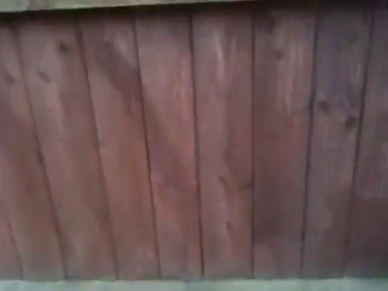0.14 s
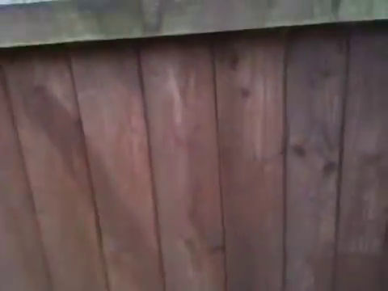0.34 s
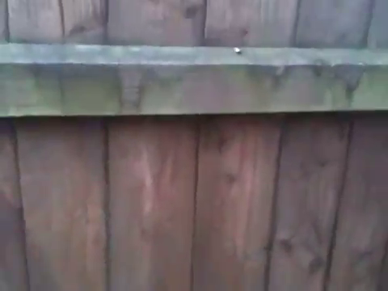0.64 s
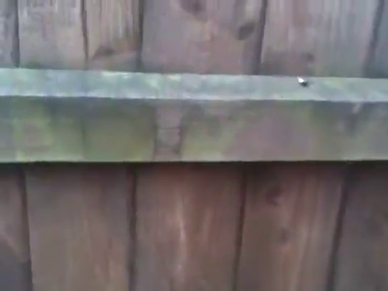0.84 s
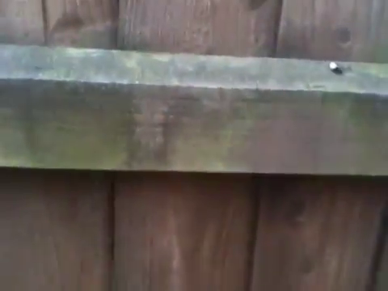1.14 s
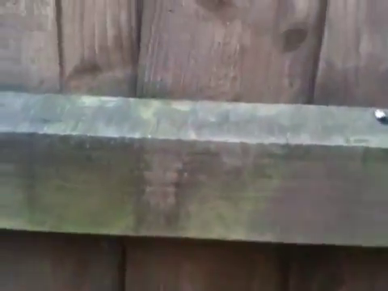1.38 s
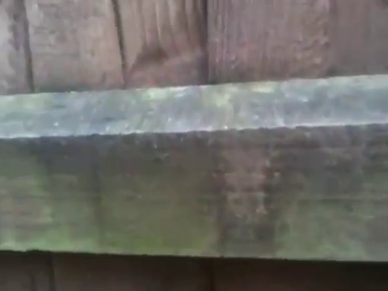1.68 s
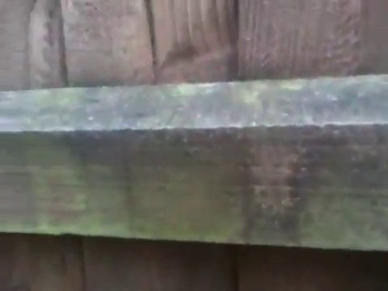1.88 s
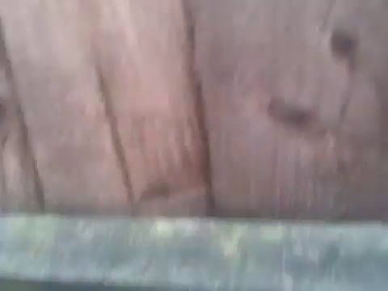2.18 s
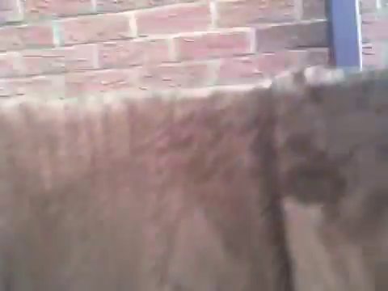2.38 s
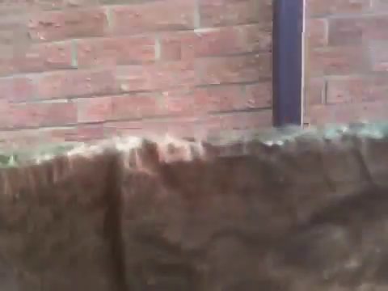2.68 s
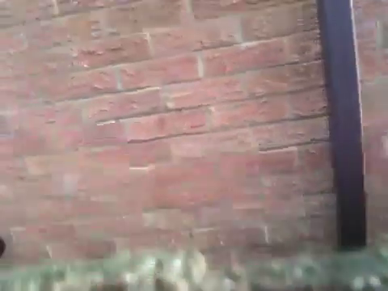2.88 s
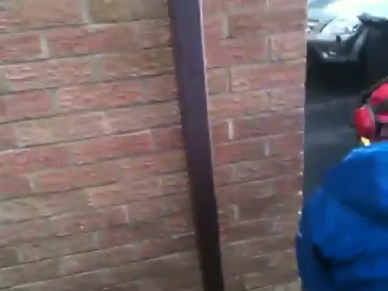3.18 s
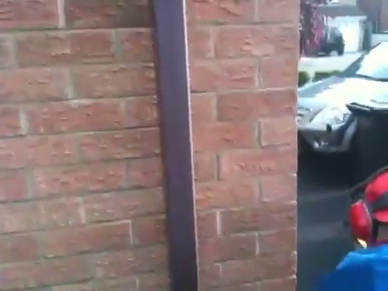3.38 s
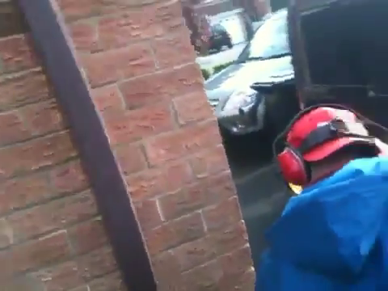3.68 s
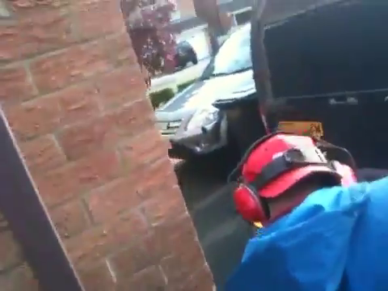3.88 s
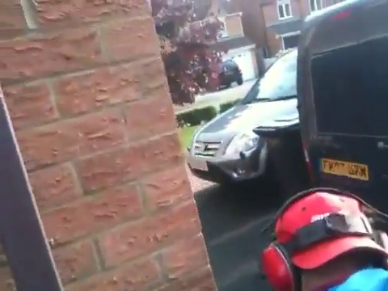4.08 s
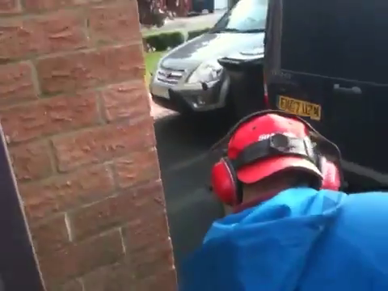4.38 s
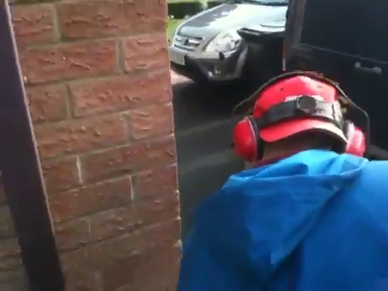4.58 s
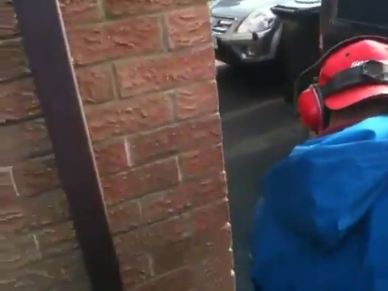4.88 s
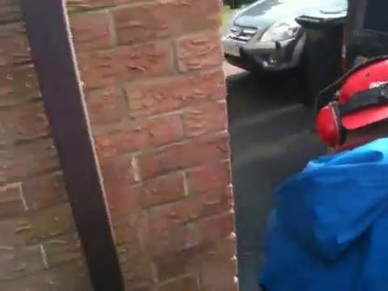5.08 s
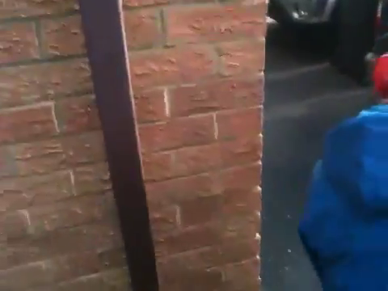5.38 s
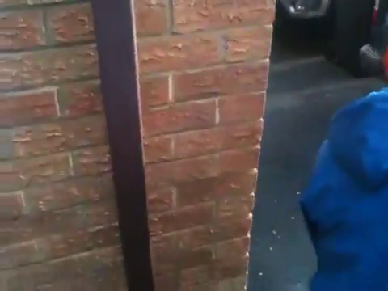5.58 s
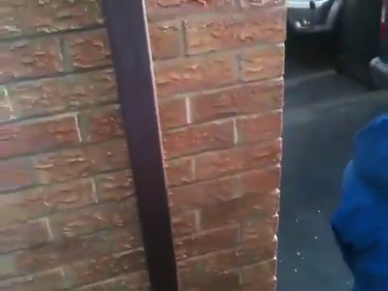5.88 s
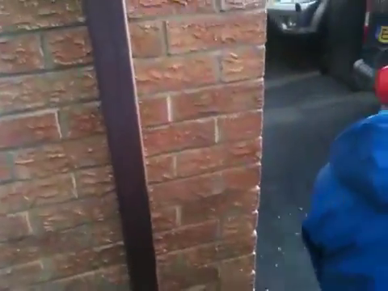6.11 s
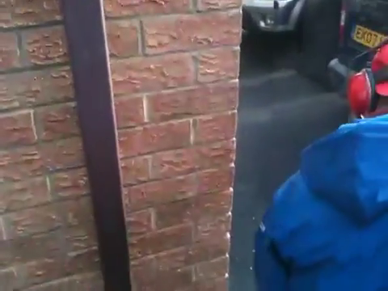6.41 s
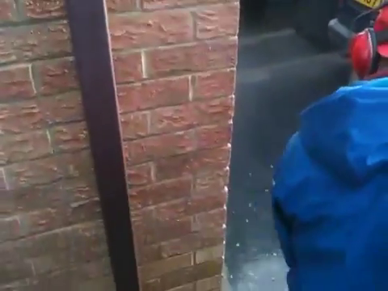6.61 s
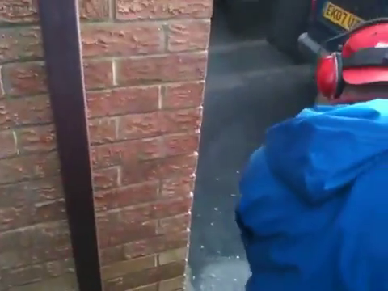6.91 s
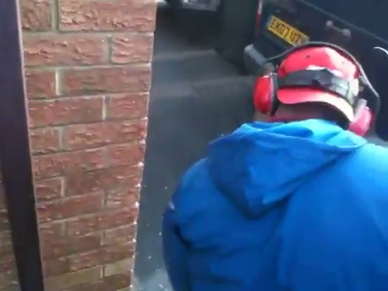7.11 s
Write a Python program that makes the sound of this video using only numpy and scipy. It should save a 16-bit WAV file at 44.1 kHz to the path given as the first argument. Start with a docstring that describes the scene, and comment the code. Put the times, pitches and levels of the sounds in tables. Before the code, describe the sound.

A pressure washer's engine runs steadily, sagging slightly as a hissing water spray begins and swells much louder.

```python
"""A driveway, with a small four-stroke engine humming and clattering behind a wooden fence as it drives
a pressure washer's pump. A trigger opens: the engine sags under the load and a spinning nozzle hisses,
its spray roaring where it lands and rasping when it hits something hollow. The single microphone starts
out screened, then comes closer, round the fence and a brick wall, so the jet grows loud and bright."""
import sys
import numpy as np
from scipy import signal
from scipy.fft import rfft, irfft, next_fast_len
from scipy.io import wavfile
from scipy.ndimage import uniform_filter1d, map_coordinates

SR = 44100
rng = np.random.default_rng(int(sys.argv[2]) if len(sys.argv) > 2 else 0)


def to_wav(s):
    """Save 16-bit WAV."""
    ch = np.atleast_2d(s).T  # columns
    pcm = np.round(np.clip(ch, -1, 1) * 32767)  # PCM
    wavfile.write(sys.argv[1], SR, pcm.astype(np.int16))


N = 319725
TIME = np.arange(N) / SR
TRIGGER_S = 1.752
FENCE_S, FENCE_PASS_S = 3, 1.23  # the microphone starts to clear the fence, and how long it takes
CORNER_S, CORNER_PASS_S = 3.764, 0.36  # the same for the corner of the brick wall


def amp(db):
    """Decibels to gain."""
    return 10 ** (np.asarray(db) / 20)


def unit(x):
    """Scale to rms 1."""
    return x / np.sqrt(np.mean(x ** 2) + 1e-20)


def curves(rows):
    """One value per sample for each column after the time."""
    s, *cols = np.transpose(rows)
    return [np.interp(TIME, s, c) for c in cols]


def ramp(start, length):
    """Rises from 0 to 1."""
    return np.clip((TIME - start) / length, 0, 1)


def wobble(rate):
    """A smooth random curve, rate knots a second."""
    coarse = np.linspace(0, N / SR, num=4000)
    knots = rng.standard_normal(int(N * rate / SR) + 4)
    return np.interp(TIME, coarse, map_coordinates(knots, [coarse * rate]))


def filtered(x, response):
    """x times a response of frequency."""
    m = next_fast_len(N + 8192)
    return irfft(rfft(x, m) * response(np.fft.rfftfreq(m, 1 / SR)), m)[:N]


def coloured(x, points, peaks=()):
    """x with a (Hz, dB) spectrum and (Hz, width, dB) resonances on top, at rms 1."""
    f, db = np.transpose(points)
    bumps = lambda hz: sum(lift / (1 + (2 * (hz - centre) / width) ** 2) for centre, width, lift in peaks)
    return unit(filtered(x, lambda hz: amp(np.interp(np.log(hz + 1), np.log(f), db) + bumps(hz))))


def noise():
    """Fresh white noise."""
    return rng.standard_normal(N)


def throb(turns, depth_db):
    """A gain that peaks once a turn."""
    return unit(amp(depth_db * np.cos(2 * np.pi * turns)))


def patches(shape, bins, frames):
    """A random field of rms 1, smooth over so many bins and frames."""
    field = uniform_filter1d(rng.standard_normal(shape), bins, axis=0)
    return unit(uniform_filter1d(field, frames, axis=1))


def narrow_noise(centre_hz, half_width_hz):
    """Noise around one frequency, at rms 1."""
    return unit(filtered(noise(), lambda hz: 1 / (1 + ((hz - centre_hz) / half_width_hz) ** 2)))


# Exhaust orders picking up speed, running free and under load: multiple of firing rate, relative level/dB
ORDERS_REVVING = [(1, -41), (2, -24), (3, -25), (4, -6), (5, -5.5), (6, -13), (7, -6.5), (8, -0.5),
                  (9, -13), (10, -23), (11, -27), (12, -19), (13, -12.5)]
ORDERS_FREE = [(1, -29), (2, -21), (3, -22), (4, 0), (5, 0), (6, -5), (7, -1.5), (8, -1.5), (9, -10),
               (10, -12), (11, -5.5), (12, -8), (13, -13.5)]
ORDERS_LOADED = [(1, -50), (2, -41), (3, -16), (4, -1), (5, 2.5), (6, -13), (7, 0.5), (8, 3.5), (9, -15),
                 (10, -2), (11, -13), (12, -16), (13, -18)]

def exhaust(cycle, gap_cycles=0.38, dispersion=0.04026):
    """Orders of the firing rate hum; their balance shifts as the engine settles, then takes the load."""
    settled, load = ramp(0.6, 0.12), ramp(TRIGGER_S + 0.27, 0.61)
    hum = np.zeros(N)
    for (order, rev_db), (_, free_db), (_, loaded_db) in zip(ORDERS_REVVING, ORDERS_FREE, ORDERS_LOADED):
        db = rev_db + settled * (free_db - rev_db) + load * (loaded_db - free_db)
        pair = 1 + 0.85 * np.exp(-2j * np.pi * order * gap_cycles)  # two puffs: exhaust, then intake
        lag = dispersion * order ** 2  # the muffler smears each puff
        hum += amp(db + 0.97 * wobble(7)) * np.sin(2 * np.pi * (order * cycle - lag) + np.angle(pair))
    steady = hum / np.sqrt(abs(uniform_filter1d(hum ** 2, size=SR // 4)))
    return amp(-39.5 + 2 * load) * steady


# Spectrum of the engine casing: f/Hz, relative level/dB
CASING_SPECTRUM = [(190, -34), (330, -15), (450, -16), (650, -8.5), (900, -7.5), (1300, -9.5),
                   (1800, -12.5), (2400, -12.5), (3000, -21), (4200, -23), (5300, -29.5), (6400, -26),
                   (8500, -32), (11000, -37.5), (13000, -48), (16000, -66)]
# Its ringing panels: f/Hz, width/Hz, lift/dB
PANEL_MODES = [(920, 30, 4.2), (1470, 64, 2.5), (2190, 100, 4.9)]

def clatter(cycle, loose_above_hz=2980, size=1400):
    """Valves and pistons repeat one burst pattern every cycle; higher up the rattle is loose and random."""
    pattern = unit(map_coordinates(rng.standard_normal(size), [cycle % 1 * size], mode="grid-wrap"))
    share = lambda hz: 0.6 / (1 + (hz / loose_above_hz) ** 2)
    regular = filtered(pattern, lambda hz: np.sqrt(share(hz)))
    loose = filtered(noise(), lambda hz: np.sqrt(1 - share(hz)))
    knocks = (regular + loose) * throb(2 * cycle, depth_db=0.2)  # two shaft turns a cycle
    return amp(-38) * coloured(knocks, CASING_SPECTRUM, PANEL_MODES)


# The engine's firing rate: t/s, f/Hz
FIRING_RATE = [(0, 31), (.3, 34), (.55, 33.8), (.75, 32.1), (.86, 32.8), (1.23, 32.3), (1.7, 33.4),
               (1.92, 33.3), (2.15, 30.1), (2.35, 30.4), (2.6, 29.6), (3.1, 30.6), (3.55, 31.05),
               (4.5, 31.1), (5.3, 30.9), (6.4, 31.08), (7.25, 31)]

def engine():
    """The whole engine follows one firing rate; hum and clatter rise as the microphone clears the fence."""
    firing_hz, = curves(FIRING_RATE)
    cycle = np.cumsum(firing_hz) / SR
    clear = ramp(FENCE_S, FENCE_PASS_S)
    return amp(3.5 * clear) * exhaust(cycle) + amp(2.5 * clear) * clatter(cycle) + whines(cycle)


# Open air around the driveway: f/Hz, relative level/dB
AIR_SPECTRUM = [(20, -33), (60, -17), (130, -3), (300, 2), (600, -6), (2000, -33)]

def outdoor_air():
    """A faint, low bed of outdoor ambience."""
    return amp(-51) * coloured(noise(), AIR_SPECTRUM)


# Handling noise at the microphone: t/s, level/dB
HAND_TOUCHES = [(.106, -62), (.27, -48)]
# Its spectrum: f/Hz, relative level/dB
TOUCH_SPECTRUM = [(5000, -25), (9000, -6), (12000, -2), (13500, -10), (15200, 0), (16500, -20)]

def ticks():
    """Faint, thin scuffs of the hand."""
    touch = sum(amp(db) * np.exp(-abs(TIME - t) / 0.005) for t, db in HAND_TOUCHES)
    return touch * coloured(noise(), TOUCH_SPECTRUM)


# Whines off the engine's panels: middle t/s, half length/s, multiple of firing rate, level/dB
PANEL_WHINES = [(.24, 0.038, 67, -43), (.41, 0.16, 48, -47.5), (.42, 0.12, 38, -49), (.54, 0.065, 34, -45),
                (0.852, 0.27, 44, -47.5), (1.0, .2, 68, -50), (1.62, 0.45, 27, -44.5),
                (5.7, 1.8, 21, -48.5), (5.7, 2.1, 18, -50.5), (5.3, 2.6, 41, -47)]

def whines(cycle, flutter_db=3):
    """Panels sing while an engine order drives them: thin tones, unsteady in level and phase."""
    out = np.zeros(N)
    for t, half_length, order, db in PANEL_WHINES:
        swell = np.exp(-((TIME - t) / half_length) ** 4) * amp(db + flutter_db * wobble(18))
        out += swell * np.sqrt(2) * np.sin(2 * np.pi * order * cycle + wobble(20))
    return out


# Low puffs: middle t/s, half length/s, level/dB, f/Hz
LOW_PUFFS = [(.67, 0.039, -43, 165), (1.81, 0.043, -32.5, 230), (2.28, 0.11, -39, 183),
             (2.45, 0.058, -37, 216), (2.7, .07, -48, 85), (3.17, .06, -56, 70), (3.66, .05, -43, 60),
             (4.16, .05, -48, 70), (5.55, 0.033, -33, 330.6)]

def puffs():
    """The valves, and air on the microphone, make short swells of low, narrow noise."""
    out = np.zeros(N)
    for t, half_length, db, hz in LOW_PUFFS:
        swell = amp(db) * np.exp(-((TIME - t) / half_length) ** 2)
        out += swell * narrow_noise(hz, half_width_hz=30)
    return out


def nozzle(start_hz=44.73, full_hz=91, spin_up_s=0.25):
    """Turns made by the nozzle, which spins up unsteadily once the trigger opens."""
    since = np.maximum(TIME - TRIGGER_S, 0)
    spin_hz = full_hz + (start_hz - full_hz) * np.exp(-since / spin_up_s)
    return np.cumsum(spin_hz + 2.54 * wobble(10)) / SR


# The jet's hiss, its lower body and its top fizz: f/Hz, relative level/dB
HISS_SPECTRUM = [(3000, -43), (5500, -29), (6700, -7.5), (7600, -2), (8800, 0), (10700, -.5), (12000, -2),
                 (13500, -10.5), (16000, -33)]
BODY_SPECTRUM = [(2000, -43), (3400, -16.5), (4400, -5), (5200, -0.5), (6100, 1.5), (7000, 1), (8000, -6.5),
                 (10000, -26)]
FIZZ_SPECTRUM = [(9000, -32), (11500, -20), (12800, 0), (14500, 1), (16200, -0.5), (17300, -1)]
# Fizz reaching the microphone: t/s, level/dB against the hiss
FIZZ_LEVEL = [(1.75, -4), (2.2, -1), (2.55, -6), (3.2, -4.5), (3.62, -2.5), (3.85, 1.8), (4.4, 0.5),
              (4.7, -2), (5.7, -3), (6.3, -.4), (7.25, -.8)]

def jet(turns, jet_db):
    """Turbulent hiss pulses with the nozzle's spin and fills out once the microphone is past the wall."""
    body_db = -8.5 + 4 * ramp(CORNER_S, CORNER_PASS_S)
    fizz_db, = curves(FIZZ_LEVEL)
    hiss = coloured(noise(), HISS_SPECTRUM)
    body = amp(body_db) * coloured(noise(), BODY_SPECTRUM)
    fizz = amp(fizz_db) * coloured(noise(), FIZZ_SPECTRUM)
    rush = ground_echo(lance_sweep(hiss + body + fizz))
    return amp(jet_db + 0.14 + 0.45 * wobble(28)) * throb(turns, depth_db=0.55) * rush


def ground_echo(x, first_notch_hz=592.1, strength=0.08):
    """One faint reflection off the ground combs the hiss; the comb drifts as the lance sways."""
    notch_hz = first_notch_hz * np.exp(0.052 * wobble(2.5))
    late = map_coordinates(x, [np.arange(N) - SR / (2 * notch_hz)], mode="nearest")
    return (x + strength * late) / np.hypot(1, strength)


# The moving peak in the jet's colour, as heard at the microphone: t/s, f/Hz, lift/dB
LANCE_PEAK = [(1.75, 7500, 3.5), (2.35, 8200, 3.5), (2.7, 10000, 0), (3.15, 9100, 0.5), (3.4, 7450, 2.5),
              (3.75, 7950, 2.5), (3.98, 6700, 2.4), (4.16, 6800, 5.5), (4.65, 5700, 1.5), (5.4, 5600, 2),
              (5.9, 7140, 2), (6.2, 6100, 1.5), (7.25, 6100, 0.5)]

def lance_sweep(x, peak_octaves=0.27, notch_octaves=0.16):
    """The lance turns beside the wall, moving a peak and a notch above it; eddies make the hiss patchy."""
    hz, t, spectrum = signal.stft(x, SR, nperseg=512)
    bell = lambda centre, octaves: np.exp(-(np.log2((hz[:, None] + 1) / centre) / octaves) ** 2)
    times, *columns = np.transpose(LANCE_PEAK)
    peak_hz, peak_db = (np.interp(t, times, column) for column in columns)
    corner_hz, corner_db = corner_band(t)
    db = peak_db * (bell(peak_hz, peak_octaves) - 0.93 * bell(1.28 * peak_hz, notch_octaves))
    db += corner_db * bell(corner_hz, peak_octaves)
    db += 1.2 * patches(spectrum.shape, bins=6, frames=14)
    db += 0.82 * patches(spectrum.shape, bins=7, frames=90)
    return signal.istft(spectrum * amp(db), SR, nperseg=512)[1][:N]


# Spray landing on the driveway: f/Hz, relative level/dB
SPLASH_SPECTRUM = [(60, -38), (110, -7), (220, 2.5), (450, -3), (600, -2), (780, -6), (1050, 0), (2100, 2),
                   (3000, -2.5), (4000, -1.5), (6000, -12), (9000, -37)]

def splash(turns, jet_db):
    """The duller roar of landing spray follows the jet; for a while the struck surface rings higher."""
    db = -16 + 0.72 * jet_db - 1.5 * ramp(CORNER_S, CORNER_PASS_S)
    ringing = ramp(2.2, 0.8) * (1 - ramp(3.7, 0.26))
    ring = amp(-3) * ringing * narrow_noise(3150, half_width_hz=520)
    roar = coloured(noise(), SPLASH_SPECTRUM) + ring
    return amp(db + 0.69 * wobble(20)) * throb(turns, depth_db=0.9) * roar


# The jet as the microphone closes in and the lance sweeps: t/s, level/dB
JET_LEVEL = [(1.84, -35.5), (1.88, -31), (2.56, -22), (2.64, -17.5), (2.8, -19), (3.19, -9), (3.42, -12.5),
             (3.57, -10), (3.72, -10), (3.84, -12), (5.3, -15.5), (5.65, -13.5), (6.25, -15), (6.42, -12.5),
             (6.95, -15), (7.04, -13.5), (7.25, -12.5)]

def spray(turns, spurt_db=9, hold_s=0.048, fall_s=0.038):
    """The trigger lets out jet and splash; pressure stored in the hose escapes first, in a spurt."""
    spurt = 1 - ramp(TRIGGER_S + hold_s, fall_s)
    jet_db = curves(JET_LEVEL)[0] + spurt_db * spurt
    return ramp(TRIGGER_S, 0.0043) * (jet(turns, jet_db) + splash(turns, jet_db))


# The jet crosses something hollow: start t/s, end t/s, level/dB, resonance f/Hz, lift/dB
HOLLOW_HITS = [(2.461, 2.494, -21.5, 1800, 8), (2.484, 2.562, -18.5, 1240, 8), (2.553, 2.621, -18, 1050, 7),
               (3.108, 3.157, -18, 1140, 6), (4.072, 4.14, -16.5, 1720, 14.5),
               (4.093, 4.176, -22.5, 980, 14), (4.14, 4.206, -21.5, 1550, 10)]
# Spectrum of the hollow surface: f/Hz, relative level/dB
HOLLOW_SPECTRUM = [(150, -31), (400, -0.5), (700, -2.5), (950, 1.5), (2200, 3.5), (3500, 0), (5000, -9),
                   (9000, -37)]

def rasps(turns):
    """Each turn of the jet slaps the hollow surface once: a sharp burst over a steady roar."""
    slaps = 1 + 2.1 * np.exp(-(turns % 1) / 0.16)
    beat = unit(slaps * amp(1.2 * wobble(90)))
    out = np.zeros(N)
    for start, end, db, hz, lift_db in HOLLOW_HITS:
        fade = 0.29 * (end - start)  # the jet slides on and off
        contact = ramp(start - fade / 2, fade) * (1 - ramp(end - fade / 2, fade))
        out += amp(db) * contact * coloured(noise() * beat, HOLLOW_SPECTRUM, [(hz, 750, lift_db)])
    return out


def corner_band(t, start_hz=13400, halving_s=0.18, lift_db=4, length_s=0.67):
    """A bright band falls through the hiss as the microphone passes the wall's corner: f/Hz, lift/dB."""
    since = np.clip(t - CORNER_S, 0, length_s)
    return start_hz / (1 + since / halving_s), lift_db * np.sin(np.pi * since / length_s)


def scene():
    """The driveway in mono: the engine runs throughout and the spray joins it."""
    motor = engine()
    turns = nozzle()
    return (motor + spray(turns) + rasps(turns) + puffs() + ticks() + outdoor_air())[None]


def record(dry):
    """The loudest peaks clip, and nothing passes above the band limit."""
    clipped = np.clip(dry[0], -1.1, 1.1)
    return filtered(clipped, lambda hz: 1 / (1 + (hz / 17330) ** 400))[None]


dry = scene()
out = record(dry)
to_wav(out)
```